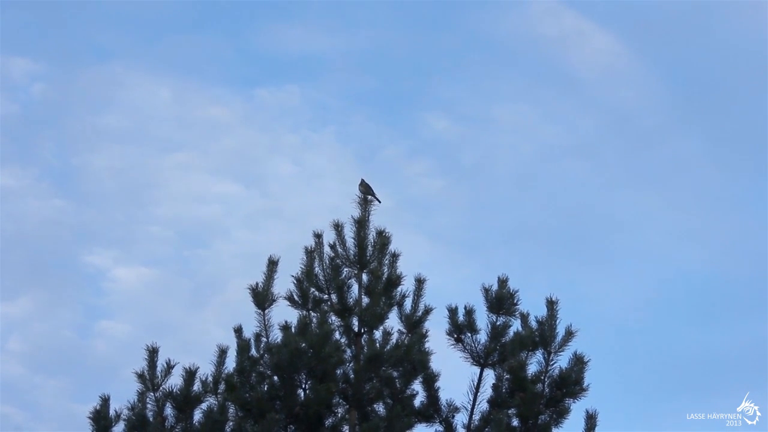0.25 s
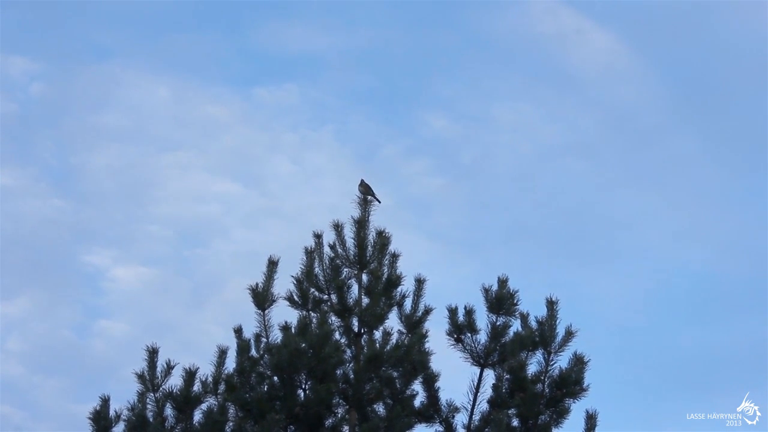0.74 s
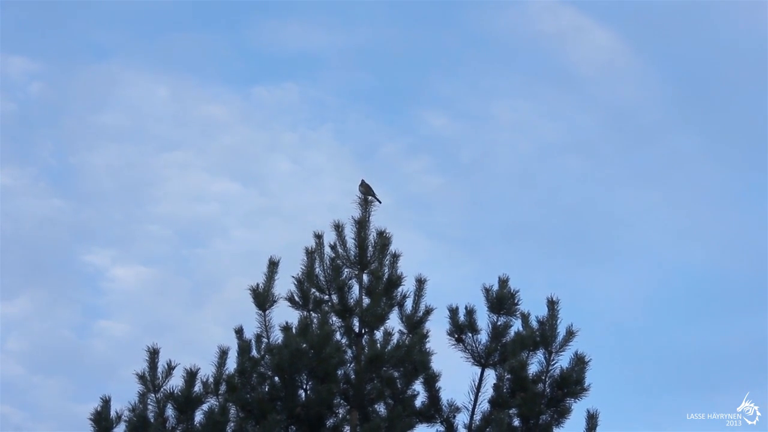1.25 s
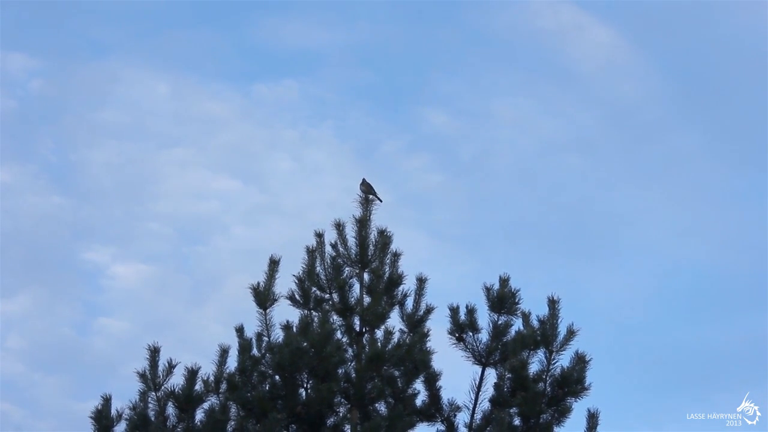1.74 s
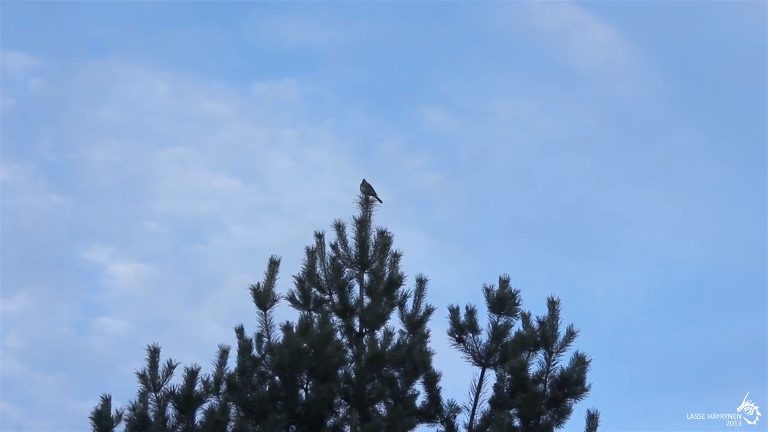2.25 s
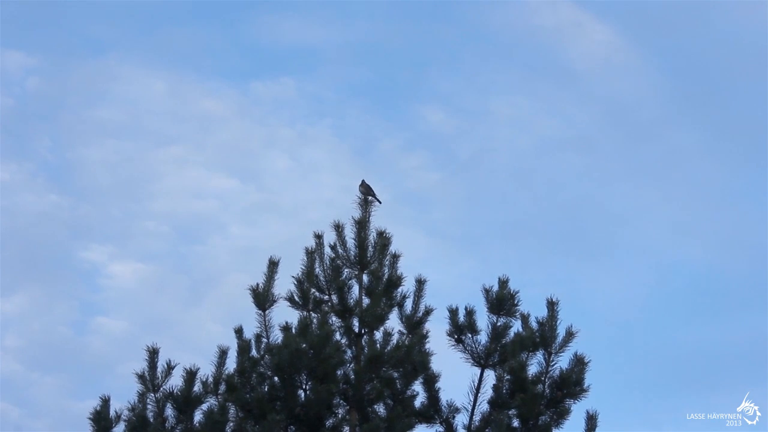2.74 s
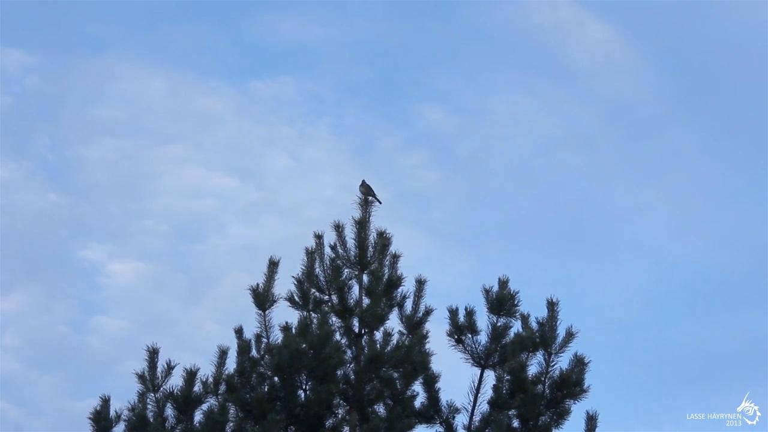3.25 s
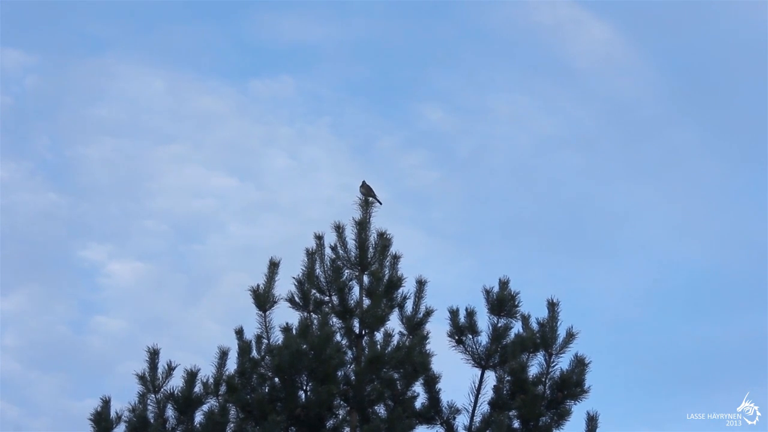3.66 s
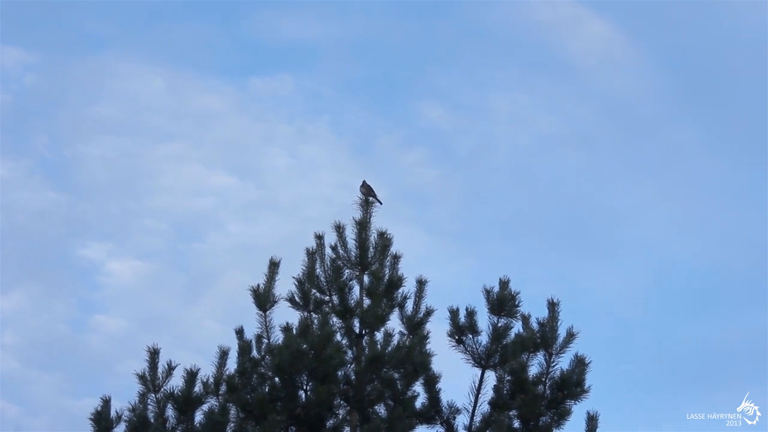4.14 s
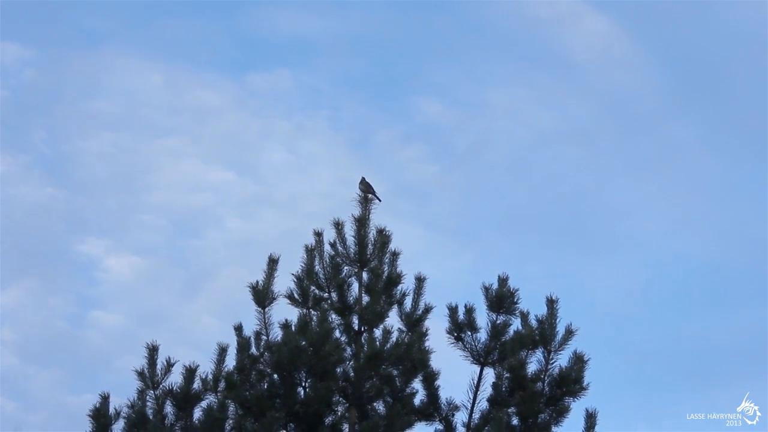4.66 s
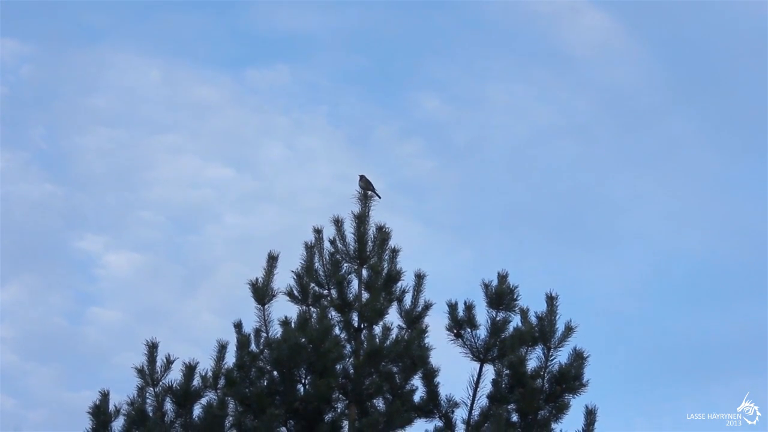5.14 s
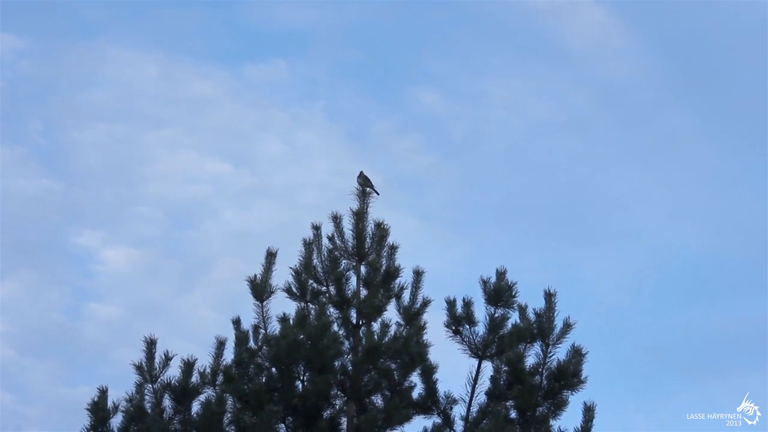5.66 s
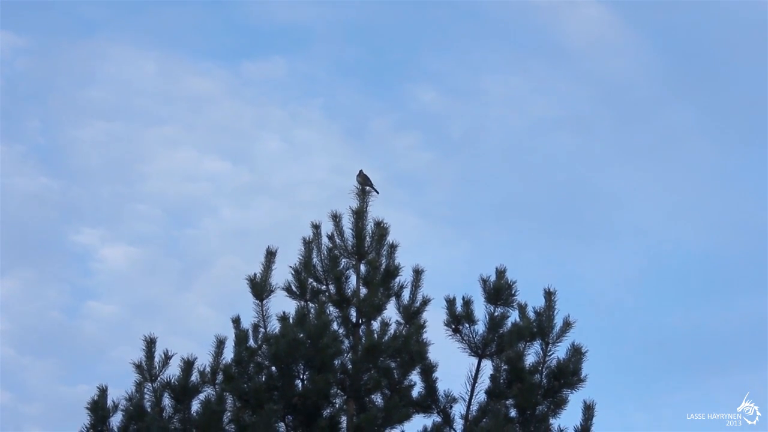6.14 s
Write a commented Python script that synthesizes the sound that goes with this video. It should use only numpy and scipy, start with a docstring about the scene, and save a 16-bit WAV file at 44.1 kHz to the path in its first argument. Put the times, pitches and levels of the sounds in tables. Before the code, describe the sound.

Outdoors, thin bird whistles give way to a quiet lull, then high notes, rattling clicks, bright downward slurs and a closing buzz above distant low rumble.

```python
"""Over a low rumble like distant traffic, a small songbird in a pine opens with thin whistles and quick flicks.
Sharp high ticks, filtered puffs of noise, dot the scene; faint far birds twitter in the lull.
Then come high two-voiced notes, more whistles, a rattling warble, loud falling slurs and a closing buzz.
Both sides of the syrinx are unsteady sines with weak overtones; the trees scatter them into a smear of echoes."""
import sys
import numpy as np
from scipy import signal
from scipy.fft import rfft, irfft
from scipy.io import wavfile

SR = 44100
rng = np.random.default_rng(int(sys.argv[2]) if len(sys.argv) > 2 else 0)


def output_pcm(signal):
    """Save a mono or channel-first signal as 16-bit PCM at the path in sys.argv[1].

    Samples are clipped to [-1, 1] before scaling.
    """
    pcm = np.clip(np.atleast_2d(signal).T, -1, 1) * 32767
    wavfile.write(sys.argv[1], SR, np.round(pcm).astype(np.int16))


N = 282240
TIME = np.arange(N) / SR
LEAD_S = .02   # run-up of a noise puff to its top
# Song levels below are rms before the trees; a crescendo is the total change, centred on the note's level.


def from_db(db):
    """Turn decibels into an amplitude factor."""
    return 10 ** (np.asarray(db) / 20)


def rms_one(x):
    """Scale to rms 1."""
    return x / np.sqrt(np.mean(x ** 2) + 1e-20)


def add(track, start_s, sound):
    """Mix a sound into a track."""
    at = max(round(start_s * SR), 0)
    track[at:at + len(sound)] += sound[:max(N - at, 0)]


def wander(size, per_s):
    """Smooth random drift around zero, with per_s new random targets a second."""
    knots = np.arange(size) * per_s / SR
    return np.interp(knots, np.arange(N // 40), rng.standard_normal(N // 40))


def shaped_noise(spectrum):
    """Steady noise with a given colour, rms 1."""
    hz, db = np.transpose(spectrum)
    bins = np.maximum(np.fft.rfftfreq(N, 1 / SR), 1)
    colour = from_db(np.interp(np.log(bins), np.log(hz), db))
    white = rng.standard_normal(N)
    return rms_one(irfft(rfft(white) * colour, N))


def burst(modes, decay_s, rise_s):
    """A puff of noise swells and dies through broad, steep-sided resonances; rms about 1 at its top."""
    t = TIME[:SR // 20]
    swell = np.exp(np.minimum((t - LEAD_S) / rise_s, (LEAD_S - t) / decay_s))
    puff = rng.standard_normal(len(t)) * swell
    out = np.zeros(len(t))
    for hz, width, db in modes:
        r = np.exp(-np.pi * width / SR)
        section = [(1 - r * r) / 2, 0, (r * r - 1) / 2, 1, -2 * r * np.cos(2 * np.pi * hz / SR), r * r]
        out += from_db(db) * signal.sosfilt([section, section], puff)   # two passes steepen the sides
    return out * np.linalg.norm(swell) / np.linalg.norm(out)


def syrinx(hz, db, jitter, edge_s=0.0022, overtone_db=-35, full_db=-31):
    """One vibrating membrane: an unsteady sine, eased in and out, with overtones only when driven hard."""
    size = len(hz)
    unsteady_hz = hz * (1 + jitter * wander(size, per_s=900))
    phase = 2 * np.pi * np.cumsum(unsteady_hz) / SR
    t = np.arange(size) / SR
    gate = np.sin(np.pi / 2 * np.clip(np.minimum(t, t[-1] - t) / edge_s, 0, 1)) ** 2
    third = np.sin(3 * phase) * (3 * hz < SR / 2)   # left out where it would alias
    overtones = np.sin(2 * phase) + .5 * third
    # below full_db the overtones sink by 2 dB more for each dB of level
    drive = from_db(overtone_db + 2 * np.minimum(db - full_db, 0))
    return np.sqrt(2) * from_db(db) * gate * (np.sin(phase) + drive * overtones)


def progress(length_s):
    """Runs from 0 to 1 through a note."""
    return np.linspace(0, 1, max(int(length_s * SR), 20))


def arc(length_s, first, middle, last):
    """Pitch bends along a parabola through three points."""
    parabola = np.polyfit([-1, 0, 1], [first, middle, last], 2)
    return np.polyval(parabola, 2 * progress(length_s) - 1)


def glide(u, first, last, settle_power=1.385):
    """Pitch moves fast at first and settles on its goal."""
    return last + (first - last) * (1 - u) ** settle_power


def plunge(t, top, bottom, halfway_s, power=1.5):
    """Pitch holds until t = 0, is halfway down after halfway_s and levels out toward the bottom."""
    return bottom + (top - bottom) / (1 + (np.maximum(t, 0) / halfway_s) ** power)


# colour of the low rumble: (frequency [Hz], relative level per Hz [dB])
RUMBLE_COLOUR = [(15, -63), (25, -22), (43, -27.5), (89, -4.5), (129, -3.5), (189, -5.5), (290, -2),
                 (415, -8), (476, -7), (605, -10.5), (648, -9), (796, -12.5), (1030, -13.5), (1330, -27),
                 (1500, -25), (1950, -56), (3300, -120)]
# colour of the thin hiss: (frequency [Hz], relative level per Hz [dB])
AIR_COLOUR = [(760, -40), (1300, -6), (1520, -5.5), (1620, -3.5), (2370, -7.5), (3560, -8), (6910, -11.5),
              (8080, -12), (9460, -12.5), (11100, -12.5), (16000, -19.5)]
# faint wavering drones in the rumble: (pitch [Hz], width [Hz], amplitude [dB])
RUMBLE_DRONES = [(290, 22, -59), (645, 20, -66), (1015, 25, -70)]


def background(rumble_db=-46, air_db=-60, sway_db=.8):
    """Far rumble of swaying level, drones softened by random amplitude, and thin hiss."""
    rumble = from_db(rumble_db + sway_db * wander(N, per_s=6)) * shaped_noise(RUMBLE_COLOUR)
    drones = np.zeros(N)
    for hz, width, db in RUMBLE_DRONES:
        drones += from_db(db) * wander(N, per_s=2 * width) * np.sin(2 * np.pi * hz * TIME)
    return rumble + drones + from_db(air_db) * shaped_noise(AIR_COLOUR)


# faint, far-off hoots: (start [s], length [s])
DISTANT_HOOTS = [(0, 0.33), (1.55, 0.4), (2.37, .36)]


def far_birds(from_s=1.4, to_s=2.4, pitch_hz=3900, level_db=-71, count=24, hoot_hz=1530, hoot_db=-68):
    """Something hoots far off; in the lull, soft randomly bent notes overlap into a twittering murmur."""
    out = np.zeros(N)
    for start, length in DISTANT_HOOTS:
        hoot_pitch = np.full_like(progress(length), hoot_hz)
        add(out, start, syrinx(hoot_pitch, hoot_db, jitter=.04, edge_s=0.045))
    for start in np.linspace(from_s, to_s, count):
        bends = pitch_hz * (1 + .12 * rng.standard_normal(3))
        add(out, start, syrinx(arc(.09, *bends), level_db, jitter=0.041, edge_s=0.024))
    return out


# notes that glide and settle:
# (start [s], length [s], start pitch [Hz], end pitch [Hz], level [dB], crescendo [dB], pitch jitter [share])
WHISTLE_NOTES = [ (0.018, 0.039, 4250, 4350, -38.5, -2, 0.038),
                 (0.054, 0.074, 4120, 3990, -34.5, 6.5, .022), (.134, .11, 5410, 5220, -43, 4, 0.011),
                 (.264, .04, 4980, 4970, -46.5, -9, 0.013), (.487, 0.03, 6250, 5230, -49, 7, .008),
                 (0.646, 0.031, 5020, 5340, -54, -7, 0.0065), (1.794, 0.32, 8550, 7800, -69.5, -7, .005),
                 (3.604, 0.055, 3140, 3246, -40, 8, .008), (3.657, .066, 3284, 3420, -37.5, 5, .026),
                 (3.724, .028, 3480, 3510, -31, -2, 0.005), (3.864, 0.12, 3336, 3617, -36.5, 12, 0.0043),
                 (4.077, 0.12, 3893, 4097, -38.5, 10.5, 0.0084), (4.202, .03, 4000, 4450, -29.5, -1, 0.009),
                 (5.282, 0.063, 3650, 4200, -49.5, 13, 0.031), (5.282, .022, 4480, 4450, -49, 16, .02),
                 (5.301, .031, 4450, 4850, -35, 2, .026), (5.336, 0.019, 5025, 5030, -29.5, -12, 0.01),
                 (5.308, .05, 5950, 5770, -51, 7, 0.017)]


def whistles():
    """Gliding notes, clear or hoarse by their pitch jitter, most of them swelling."""
    out = np.zeros(N)
    for start, length, first, last, db, crescendo, jitter in WHISTLE_NOTES:
        u = progress(length)
        add(out, start, syrinx(glide(u, first, last), db + crescendo * (u - .5), jitter))
    return out


# high ticks: (time [s], level before trim [dB])
HIGH_TICKS = [(0.1406, -42.5), (0.2718, -43), (0.8037, -44.5), (1.1812, -43), (1.2585, -40), (2.092, -49),
              (2.5636, -46.5), (4.275, -40), (4.792, -41), (4.9693, -43), (5.0639, -43), (5.1711, -38.5),
              (5.3482, -44), (5.4024, -41.5), (5.5246, -42), (6.068, -47)]
# what a tick rings with: (frequency [Hz], resonance width per pass [Hz], relative level [dB])
TICK_RESONANCES = [(5200, 1500, -1), (10780, 1500, 4.5)]


def ticks(trim_db=-3, lag_s=0.0011):
    """Dry ticks, a few milliseconds long: noise puffs rung through two high resonances."""
    out = np.zeros(N)
    for time_s, db in HIGH_TICKS:
        tick = burst(TICK_RESONANCES, decay_s=0.0014, rise_s=0.0007)
        add(out, time_s + lag_s - LEAD_S, from_db(db + trim_db) * tick)
    return out


# quick upward sweeps: (start [s], length [s], start pitch [Hz], end pitch [Hz], mid-note level [dB])
UPWARD_FLICKS = [(0.338, .028, 4540, 5700, -45), (.408, 0.03, 4460, 5720, -46.5),
                 (.463, .023, 4600, 5460, -49), (0.568, 0.022, 3850, 6040, -46.5),
                 (3.991, 0.021, 3610, 4680, -32.5), (4.389, .023, 3145, 4120, -36),
                 (4.472, 0.033, 5200, 6100, -56), (4.549, .019, 4800, 6520, -46),
                 (4.82, 0.022, 4650, 6050, -50), (5, 0.03, 4090, 7000, -51)]


def flicks(jitter=.011, fade_db=-5.5, rise_power=0.96):
    """Quick, nearly straight upward sweeps that fade as they rise."""
    out = np.zeros(N)
    for start, length, first, last, db in UPWARD_FLICKS:
        u = progress(length)
        pitch = first + (last - first) * u ** rise_power
        add(out, start, syrinx(pitch, db + fade_db * (u - .5), jitter))
    return out


# thin two-voiced notes: (start [s], length [s], upper pitch [Hz], upper level [dB],
# lower start pitch [Hz], lower end pitch [Hz], lower level [dB])
DUET_NOTES = [(2.929, 0.1, 8150, -43, 7280, 7520, -56), (3.09, 0.14, 7860, -47.5, 7290, 7020, -48.5),
              (3.293, 0.16, 7650, -48, 7260, 6470, -47)]


def duets(crescendo_db=3, jitter=0.0085, edge_s=0.027):
    """Both sides of the syrinx sing very high, the upper holding its pitch and the lower sliding."""
    out = np.zeros(N)
    for start, length, upper_hz, upper_db, first, last, lower_db in DUET_NOTES:
        u = progress(length)
        swell = crescendo_db * (u - .5)
        upper_pitch = np.full_like(u, upper_hz)
        lower_pitch = glide(u, first, last)
        add(out, start, syrinx(upper_pitch, upper_db + swell, jitter, edge_s=edge_s))
        add(out, start, syrinx(lower_pitch, lower_db + swell, jitter, edge_s=edge_s))
    return out


# rattle strokes:
# (click time [s], base level [dB], pip time [s], pip top pitch [Hz], groan level [dB])
RATTLE_STROKES = [(4.2498, -35, 4.2885, 2890, -49), (4.375, -35, 4.418, 3180, -57),
                  (4.5145, -34, 4.558, 2980, -55), (4.665, -35, 4.708, 3150, -48),
                  (4.87, -33, 4.909, 3274, -45.5)]
# rasp of a click: (frequency [Hz], resonance width per pass [Hz], relative level [dB])
RASP_RESONANCES = [(2180, 1600, 3.5), (5330, 2100, 3.5), (10300, 2700, -1)]


def rattle(rasp_db=-1.0, lower_db=-4, upper_db=-2, rasp_lag_s=.003, pip_db=-1,
           groan_low_db=-6, groan_s=.028, groan_sag=.15):
    """Both voices flick upward with a rasp; a faint groan sags and ends in a tiny arched pip."""
    out = np.zeros(N)
    u = progress(groan_s)
    for click_s, db, pip_s, top_hz, groan_db in RATTLE_STROKES:
        lower = syrinx(arc(0.007, 1380, 2700, 3700), db + lower_db, jitter=.09, edge_s=0.0011)
        upper = syrinx(arc(0.00514, 4640, 5980, 6300), db + upper_db, jitter=0.054, edge_s=0.0013)
        rasp = from_db(db + rasp_db) * burst(RASP_RESONANCES, decay_s=0.004, rise_s=0.0048)
        add(out, click_s, lower)
        add(out, click_s + 0.0022, upper)
        add(out, click_s + rasp_lag_s - LEAD_S, rasp)

        groan_hz = top_hz * (1 + groan_sag * (1 - u))
        groan = syrinx(groan_hz, groan_db, jitter=.02)
        octave_below = syrinx(groan_hz / 2, groan_db + groan_low_db, jitter=0.021)
        add(out, pip_s - groan_s, groan + octave_below)

        pip_pitch = arc(0.0082, 0.366 * top_hz, top_hz, 0.64 * top_hz)
        add(out, pip_s, syrinx(pip_pitch, db + pip_db, jitter=0.027, edge_s=0.00089))
    return out


# chain of hoarse arches:
# (start [s], length [s], slope start [Hz], slope end [Hz], level [dB], crescendo [dB])
WARBLE_NOTES = [(4.338, 0.085, 3345, 3690, -40.5, -1), (4.477, 0.1, 3940, 4230, -37, 7.5),
                (4.697, 0.064, 3850, 3513, -39.5, 2), (4.818, .066, 3780, 4890, -40.5, 3),
                (4.944, 0.1, 4600, 4275, -44, 2.5)]


def warbles(arch_s=0.033, arch_depth=0.151, jitter=0.027):
    """The pitch bounces in quick arches along a slow slope."""
    out = np.zeros(N)
    for start, length, first, last, db, crescendo in WARBLE_NOTES:
        u = progress(length)
        arches = np.abs(np.sin(np.pi * u * length / arch_s)) - 2 / np.pi   # 2/pi is the mean of an arch
        slope = first + (last - first) * u
        add(out, start, syrinx(slope * (1 + arch_depth * arches), db + crescendo * (u - .5), jitter))
    return out


# loud falling slurs: (start of the plunge [s], reference top pitch [Hz], bottom pitch [Hz], base level [dB])
FALLING_SLURS = [(5.488, 5684, 3720, -34), (5.847, 5334, 3514, -31.5)]
# the two voices of a slur: (lag [s], top pitch ratio, level offset [dB], extra level at the steepest fall [dB],
# lead-in [s], fall [s], lead-in pitch rise [Hz], time to halfway down [s])
SLUR_SIDES = [(0, .99, 0, -7, .052, .118, 20, .017), (.017, 1.085, 1.3, 6.5, .052, .085, 600, .012)]


def slurs(jitter=0.0078, plunge_jitter=.022, full_early_s=.022, swell_db_per_s=470, fade_db_per_s=30):
    """Two voices swell high, plunge one after the other and level out; the second takes over in the fall."""
    out = np.zeros(N)
    for at, top, bottom, db in FALLING_SLURS:
        for lag, ratio, voice_db, plunge_db, lead_s, fall_s, rise, halfway_s in SLUR_SIDES:
            t = np.arange(-lead_s, fall_s, 1 / SR)
            lead_in = rise * (np.minimum(t, 0) / lead_s) ** 2
            pitch = plunge(t, top * ratio, bottom, halfway_s) - lead_in
            speed = np.abs(np.gradient(pitch))
            speed = speed / speed.max()
            swell = swell_db_per_s * np.minimum(t + full_early_s, 0)
            fade = fade_db_per_s * np.maximum(t, 0)
            level = db + voice_db + swell - fade + plunge_db * speed
            add(out, at + lag - lead_s, syrinx(pitch, level, jitter + plunge_jitter * speed))
    return out


def chirps(after_s=.165, length_s=.074, attack_s=.023, level_db=-29.7,
           pitch_hz=4530, sag_hz=160, scoop_hz=650, swell_db=20, jitter=0.036):
    """After each slur the voice scoops up again and holds a hoarse, slightly sagging note."""
    out = np.zeros(N)
    u = progress(length_s)
    rising = np.maximum(1 - u * length_s / attack_s, 0)   # 1 at the start, 0 once the attack is over
    pitch = pitch_hz - sag_hz * u - scoop_hz * rising ** 2
    for plunge_s, *_ in FALLING_SLURS:
        add(out, plunge_s + after_s, syrinx(pitch, level_db - swell_db * rising, jitter))
    return out


# strokes of the closing buzz:
# (break time [s], held voice level [dB], level of the high voice as it comes down [dB])
BUZZ_BREAKS = [(6.222, -30, -29), (6.286, -26, -50)]
# colour of the hiss in the buzz: (frequency [Hz], relative level per Hz [dB])
BUZZ_HISS_COLOUR = [(3500, -45), (5000, 6), (6500, 2), (8600, -24), (9600, -30), (12000, -11), (15000, -34)]


def buzz(from_s=6.156, held_hz=5633, high_hz=8600, low_hz=4300, high_top_db=-46,
         meet_s=0.046, meet_db=-37, swell_db=21, hold_s=.033, drop_s=.013, drop_fade_db=10,
         high_lag_s=0.01, high_s=.052, high_hold_s=.005, high_fall_s=.015, flutter_per_s=190, flutter_depth=.09,
         hiss_at_s=6.258, hiss_db=-37, hiss_width_s=0.035):
    """Two voices meet; one breaks downward twice as the other flutters down from above, amid hiss."""
    out = np.zeros(N)
    u = progress(meet_s)
    for path in arc(meet_s, 6700, 6300, held_hz), arc(meet_s, 5170, 5430, held_hz):
        add(out, from_s, syrinx(path, meet_db + swell_db * (u - .5), jitter=0.024))

    dropped = np.maximum(np.arange(-hold_s, drop_s, 1 / SR), 0) / drop_s
    breaking_hz = held_hz + (low_hz - held_hz) * dropped

    t = progress(high_s) * high_s
    height = plunge(t - high_hold_s, 1, 0, high_fall_s)
    # the sawtooth flutter deepens as the voice comes down
    flutter = 1 - flutter_depth * (1 - height) * signal.sawtooth(2 * np.pi * flutter_per_s * t)
    falling_hz = (held_hz + (high_hz - held_hz) * height) * flutter

    for at, held_db, high_db in BUZZ_BREAKS:
        held = syrinx(breaking_hz, held_db - drop_fade_db * dropped, jitter=0.01 + .02 * dropped)
        falling_db = high_top_db * height + high_db * (1 - height)
        add(out, at - hold_s, held)
        add(out, at + high_lag_s, syrinx(falling_hz, falling_db, jitter=0.028))

    cloud = np.exp(-((TIME - hiss_at_s) / hiss_width_s) ** 2)
    return out + from_db(hiss_db) * cloud * shaped_noise(BUZZ_HISS_COLOUR)


# echoes from near crowns: (delay [s], level [dB])
CROWN_ECHOES = [(.017, -14.5), (.031, -13)]


def trees(x, direct_db=-2.5, scatter_db=-7, scatter_t60=0.24, tail_db=-12.5, tail_t60=0.76):
    """Direct sound, two echoes, separate glints off near branches and a faint dense tail from farther trees."""
    t = TIME[:SR]
    response = np.zeros(SR)
    # t60 is the time [s] to die away by 60 dB
    for db, t60, paths_per_s in (scatter_db, scatter_t60, 900), (tail_db, tail_t60, SR):
        paths = rng.standard_normal(SR) * (rng.random(SR) < paths_per_s / SR)
        cloud = paths * np.exp(-np.log(1000) * t / t60) * (1 - np.exp(-t / .003))
        response += from_db(db) * cloud / np.linalg.norm(cloud)
    response[0] += from_db(direct_db)
    for delay, db in CROWN_ECHOES:
        response[round(delay * SR)] += from_db(db)
    return signal.fftconvolve(x, response)[:N]


def scene():
    """The birds and the drier ticks among the trees, over the background."""
    opening = whistles() + flicks() + duets()
    finale = rattle() + warbles() + slurs() + chirps() + buzz()
    song = trees(far_birds() + opening + finale)
    high_ticks = trees(ticks(), direct_db=2.0, scatter_db=-20, tail_db=-19)
    return (background() + song + high_ticks)[None]


def record(dry, cutoff_hz=15900):
    """A steep low-pass cuts the top."""
    return signal.sosfilt(signal.ellip(12, .1, 70, cutoff_hz, fs=SR, output="sos"), dry)


dry = scene()
out = record(dry)
output_pcm(out)
```